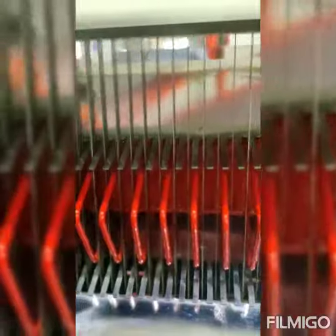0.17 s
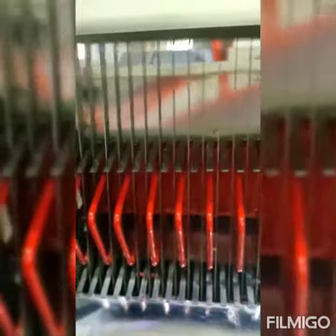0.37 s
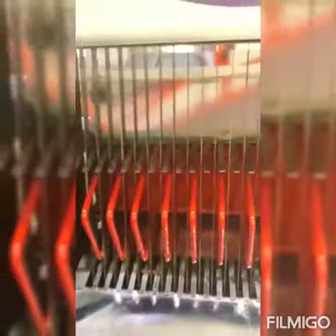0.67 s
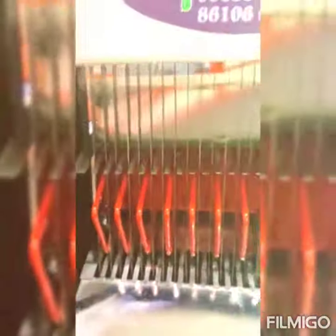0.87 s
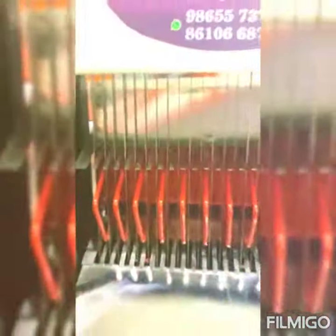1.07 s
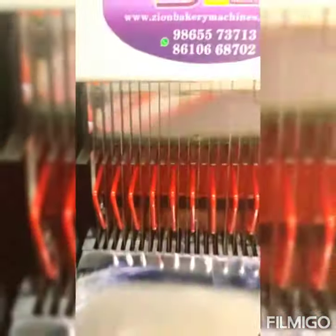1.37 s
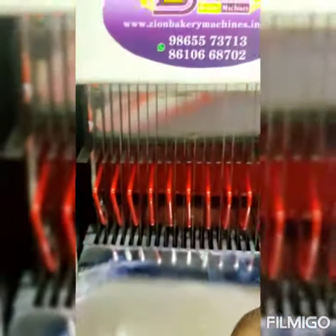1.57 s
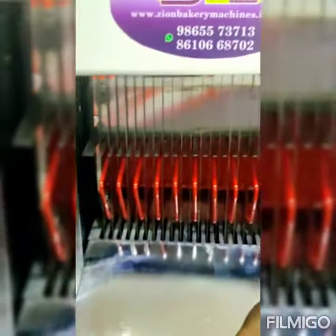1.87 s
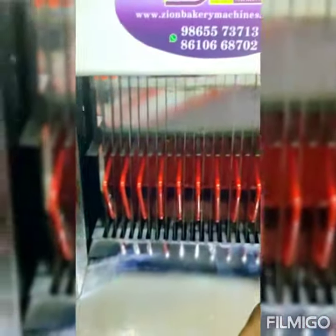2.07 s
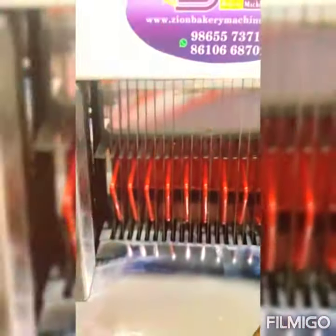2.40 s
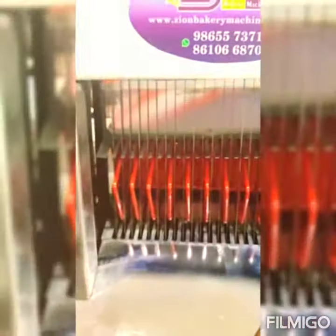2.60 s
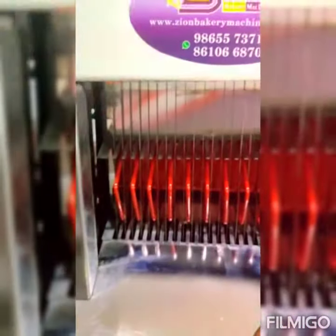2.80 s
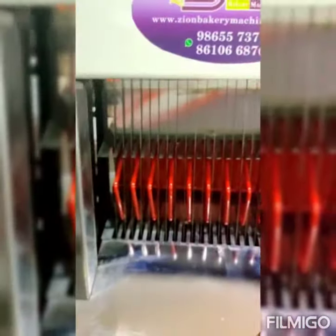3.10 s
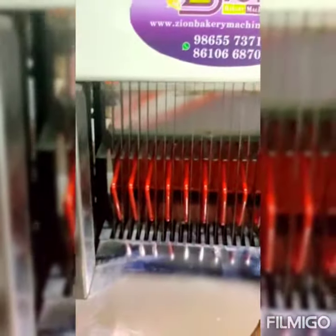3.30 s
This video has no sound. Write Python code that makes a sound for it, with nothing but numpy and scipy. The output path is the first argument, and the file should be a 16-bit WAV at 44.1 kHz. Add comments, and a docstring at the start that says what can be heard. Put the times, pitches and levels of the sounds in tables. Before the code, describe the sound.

A bread slicer is already running and never stops for about 3.5 seconds, close and dry indoors. Boxy sheet-metal rattle throbs rapidly over motor hum and a low drone that swells and sinks, strongest early. Thin blade hiss rides on top. Light knocks come in the first second, with growls near 0.3 and 0.5; faint clinks follow from 1.3. Thuds land at 2.2 and, loudest, 2.5, then a panel growls around 2.75 and 3.0.

```python
"""Play in a bread slicer's crank linkage rattles its sheet-metal housing: impacts excite panel resonances.
The motor adds harmonics of a magnetic hum, slightly wavering drive tones and a low, swelling housing drone.
Blades hiss and ring in their guides with the strokes: grainy friction excites their modes.
Loose metal knocks, a panel growls in short fits, frames clink, and single blades whine, scrape and tick.
The machine runs steadily and is heard from close by in a bakery."""
import sys
import numpy as np
from scipy import signal
from scipy.fft import rfft, irfft
from scipy.io import wavfile

SR = 44100
rng = np.random.default_rng(int(sys.argv[2]) if len(sys.argv) > 2 else 0)


def wav_out(sig):
    """Save sig, one row per channel (or a flat mono array), as 16-bit PCM at SR to the path in sys.argv[1]."""
    wavfile.write(sys.argv[1], SR, np.round(np.clip(np.atleast_2d(sig).T, -1, 1) * 32767).astype(np.int16))


N = 152145
T = np.arange(N) / SR
CRANK_HZ, HUM_HZ = 8.9, 100
# where in a crank turn the frames reverse and where they move fastest (turns)
REVERSAL_TURN, MID_STROKE_TURN = 0.43, 0.16

# levels of the friction and impact sources, before each source's own trim:
# time_s, low_rattle_db, upper_rattle_db, chatter_db, hiss_db
LEVELS = [(0, -16.5, -21.5, -42.5, -36.5), (.8, -18, -22, -45, -37), (1.15, -22, -23.5, -45.5, -39.5),
          (1.95, -22.5, -23, -46.5, -40), (2.4, -20.5, -21.5, -43.5, -41), (3.45, -21, -21.5, -43, -38)]
# broad response of the housing: frequency_hz, relative_db
HOUSING = [(20, -11), (45, -26.5), (90, -8.5), (160, -7), (300, -0.5), (460, -10.5), (620, -3), (800, -2.5),
           (940, -7), (1100, -20.5), (1400, -35), (3000, -63)]
# panel resonances: frequency_hz, width_hz, db_above_broad_response
PANELS = [(125.4, 17.5, 8.5), (172, 14, 9.5), (226, 11, 6), (284, 40, 1.5), (407.3, 32.7, 13),
          (511.4, 16, 8), (603, 13, 6), (658, 13.4, 7)]
# broad response of the guides: frequency_hz, relative_db
GUIDES = [(600, -30), (1150, -6), (1330, -4), (1600, 1), (2050, -5), (2550, -6.5), (3400, -12.5),
          (4500, -12.5), (8000, -30.5)]
# guide resonances: frequency_hz, width_hz, db_above_broad_response
GUIDE_MODES = [(1488, 21, 8.5), (1570, 29, 3), (1715, 14, 6)]


def amp(db):
    """Amplitude gain is ten to the power of decibels over twenty."""
    return 10 ** (np.asarray(db) / 20)


def unit(x):
    """Dividing by the root mean square gives unit power."""
    return x / np.sqrt(np.mean(x ** 2) + 1e-20)


def level(table, axis=1):
    """Gain over time, linear in decibels between the table's points."""
    rows = np.transpose(table)
    return amp(np.interp(T, rows[0], rows[axis]))


def wander(rate_hz):
    """Low-passed noise of about unit rms: a slow random fluctuation."""
    hz = np.fft.rfftfreq(2 * N, 1 / SR)
    spectrum = rfft(rng.standard_normal(2 * N)) / (1 + (hz / rate_hz) ** 4)
    return unit(irfft(spectrum))[:N]


def colour(x, points, peaks=(), size=16384):
    """Minimum-phase filter: the log gain's Hilbert transform sets the phase, so the response is causal."""
    hz = np.fft.rfftfreq(size, 1 / SR)
    f, db = np.transpose(points)
    gain = amp(np.interp(np.log(hz + 1), np.log(f), db))
    for centre, width, peak_db in peaks:
        excess_power = amp(peak_db) ** 2 - 1
        gain = gain * np.sqrt(1 + excess_power / (1 + (2 * (hz - centre) / width) ** 2))
    log_gain = np.log(np.concatenate([gain, gain[-2:0:-1]]))
    minimum_phase = np.exp(signal.hilbert(log_gain).conj())
    ring = np.fft.ifft(minimum_phase).real[:size // 2]
    return unit(irfft(rfft(x, N) * rfft(ring, N), N))


def mode(x, hz, width):
    """A damped resonance, fixed or gliding: heterodyne to zero, low-pass, shift back; unit rms."""
    turn = np.exp(2j * np.pi * np.cumsum(hz * np.ones(len(x))) / SR)
    pole = np.exp(-np.pi * width / SR)
    return unit((turn * signal.lfilter([1], [1, -pole], x / turn)).imag)


def impacts(per_s, spread_db):
    """A random point process of signed impulses with exponentially spread decibel sizes."""
    sizes = amp(spread_db * np.minimum(rng.exponential(1, N), 4))
    signs = rng.choice([-1, 1], N)
    return unit(sizes * signs * (rng.random(N) < per_s / SR))


def strokes(phase, twice_db, once_db):
    """Amplitude modulation at twice and once the crank frequency: two unequal strokes per turn."""
    angle = 2 * np.pi * (CRANK_HZ * T - phase)
    return unit(amp(twice_db * np.cos(2 * angle) + once_db * np.cos(angle)))


def strike(age, rise_s, decay_s):
    """Transient envelope: a linear rise, then the exponential decay of damped energy."""
    return np.minimum(age / rise_s, 1) * np.exp(-np.maximum(age - rise_s, 0) / decay_s)


def tone(hz, waver_db, drift, rate_hz):
    """A sinusoid with random amplitude and phase modulation (drift in radians)."""
    loudness = np.sqrt(2) * amp(waver_db * wander(rate_hz))
    return loudness * np.sin(2 * np.pi * (hz * T + rng.random()) + drift * wander(rate_hz))


def rattle():
    """Impact excitation of panel modes: linkage play strikes the housing in a swell with the crank."""
    # swell above and below the mean, once a turn: time_s, swell_db
    swell_curve = [(0, 2.5), (.4, 1), (.85, 2.5), (1.1, 1.1), (3.45, 0.8)]
    low_trim_db, upper_trim_db, split_hz = -4.5, -5, 577
    buzz = amp(0.83 * np.cos(2 * np.pi * HUM_HZ * T))  # swells at the hum frequency
    swing = level(swell_curve) ** np.cos(2 * np.pi * (CRANK_HZ * T - REVERSAL_TURN))
    stroke_swell = strokes(REVERSAL_TURN, twice_db=0.25, once_db=-0.5)
    drive = impacts(per_s=2200, spread_db=2.0) * stroke_swell * swing * buzz
    body = colour(drive, HOUSING, PANELS)
    low = signal.sosfiltfilt(signal.butter(4, split_hz, fs=SR, output="sos"), body)
    low_rattle = amp(low_trim_db) * level(LEVELS, axis=1) * unit(low)
    upper_rattle = amp(upper_trim_db) * level(LEVELS, axis=2) * unit(body - low)
    return low_rattle + upper_rattle


def motor():
    """Magnetic force gives hum harmonics, the drive wavering tones, the housing a drone that swells and sinks."""
    # one level_db for each multiple of the hum frequency
    hum_levels = [-52, -34, -34.5, -46.5, -37, -44.5, -41]
    # drive tones: pitch_hz, level_db
    drive_tones = [(70.1, -43.5), (225.5, -37.5), (409.6, -36), (656.6, -36.5)]
    # low housing drone: time_s, level_db
    drone_curve = [(0, -24), (.25, -34.5), (.45, -26), (.73, -26), (1.06, -31.5), (1.2, -27), (1.79, -30.5),
                   (1.9, -40.5), (3.45, -32.5)]
    hum = sum(amp(db) * tone(HUM_HZ * (k + 1), waver_db=-1.45, drift=0.15, rate_hz=0.93)
              for k, db in enumerate(hum_levels))
    drive = sum(amp(db) * tone(hz, waver_db=2.0, drift=0.24, rate_hz=3.7) for hz, db in drive_tones)
    drone = tone(122, waver_db=0.4, drift=0.25, rate_hz=5)
    return hum + drive + level(drone_curve) * drone


def burst(rise_s, decay_s, axis):
    """Transient excitation: noise under one strike envelope per knock, at the given level column."""
    # knocks of loose metal: start_s, thud_db, clank_db, sizzle_db
    knock_rows = [(0.057, -29, -33.5, -34.5), (0.382, -35.5, -30, -29), (0.709, -29, -31.5, -48),
                  (.799, -31, -51.5, -39.5), (1.019, -31, -47, -49), (2.185, -22.5, -37.5, -35.5),
                  (2.5198, -15, -32, -29.5), (2.845, -38.5, -36, -35.5)]
    envelope = np.zeros(N)
    for row in knock_rows:
        age = np.maximum(T - row[0], 0)
        envelope += amp(row[axis]) * strike(age, rise_s, decay_s)
    return envelope * rng.standard_normal(N)


def knocks():
    """One blow excites three resonators: the housing thuds, the guides clank, the blades sizzle."""
    # response of the knocked blades: frequency_hz, relative_db
    sizzle_response = [(2000, -27.5), (4700, -22), (5400, -4), (6000, 8), (7700, 4.5), (8300, -17.5)]
    thud = burst(rise_s=0.001, decay_s=0.01, axis=1)
    clank = burst(rise_s=0.001, decay_s=0.016, axis=2)
    sizzle = burst(rise_s=0.002, decay_s=0.014, axis=3)
    # the filter normalizes power, so each burst's own rms is restored
    out = thud.std() * colour(thud, HOUSING, PANELS)
    out += clank.std() * colour(clank, GUIDES, GUIDE_MODES)
    return out + sizzle.std() * colour(sizzle, sizzle_response)


def growl():
    """Noise-driven gliding resonance: a loose panel growls in short fits, its pitch sagging."""
    # modes of the loose panel: frequency_hz at mid-fit, width_hz, relative_db
    loose_modes = [(292, 12, -2), (402, 7.4, -2), (490, 28, -11)]
    # fits of growling: middle_s, level_db
    fits = [(0.291, -24.5), (.51, -28), (2.18, -26.5), (2.755, -20.5), (2.99, -25.5)]
    spread_s, sag_per_s = 0.037, 0.28  # Gaussian spread, fractional fall in pitch
    out = np.zeros(N)
    for middle, db in fits:
        near = abs(T - middle) < 0.1
        age = T[near] - middle
        glide = 1 - sag_per_s * age
        ring = sum(amp(mode_db) * mode(rng.standard_normal(len(age)), hz * glide, width)
                   for hz, width, mode_db in loose_modes)
        out[near] += amp(db) * np.exp(-0.5 * (age / spread_s) ** 2) * ring
    return out


def blades():
    """Friction as dense random impacts: blades hiss through frame modes, strongest at mid-stroke."""
    # broad response of the blades: frequency_hz, relative_db
    blade_response = [(1000, -8), (2200, -8.5), (3000, -3.5), (3500, -6), (4100, -7.5), (5000, -4.5),
                      (5600, 0.5), (6000, 1.5), (6550, 3.5), (7300, -1.5), (7850, -7.5), (8100, -31.5)]
    # frame resonances: frequency_hz, width_hz, db_above_broad_response
    frame_modes = [(5930, 110, 3.5), (6530, 110, 3.5), (7240, 110, 3)]
    trim_db = -5.5
    flicker = amp(1.4 * wander(rate_hz=85))
    drive = impacts(per_s=7000, spread_db=-1.0) * strokes(MID_STROKE_TURN, twice_db=2.0, once_db=1.3)
    return amp(trim_db) * level(LEVELS, axis=4) * colour(drive * flicker, blade_response, frame_modes)


def chatter():
    """Repeated contact across a clearance: the frames chatter unevenly in their resonant guides."""
    trim_db = -2
    uneven = amp(1.9 * wander(rate_hz=10))
    drive = impacts(per_s=3600, spread_db=2.0) * strokes(REVERSAL_TURN, twice_db=0.2, once_db=-1.3)
    return amp(trim_db) * level(LEVELS, axis=3) * colour(drive * uneven, GUIDES, GUIDE_MODES)


def pings(count=22):
    """Impulse response of tuned bars: each blade ticks on its guide and rings at its own pitch."""
    low_hz, high_hz, width_hz = 5910, 7560, 36
    trim_db = -9  # applied to the hiss column
    pitches = np.linspace(low_hz, high_hz, count) + rng.uniform(-40, 40, count)
    swell = strokes(MID_STROKE_TURN, twice_db=0.5, once_db=0.4)
    out = sum(mode(impacts(per_s=15, spread_db=2.5) * swell, hz, width_hz) for hz in pitches)
    return amp(trim_db) * level(LEVELS, axis=4) * unit(out)


def clinks():
    """Struck resonance with contact noise: a frame grazes its guide and rings briefly with some rasp."""
    # grazes: start_s, level_db, pitch_hz
    grazes = [(1.29, -40, 1550), (1.473, -41.5, 1520), (1.62, -41, 1514), (1.719, -43, 1490),
              (2.776, -40, 1490), (3.122, -39.5, 1500), (3.3, -42, 1565)]
    rise_s, decay_s, width_hz, rasp_db = 0.004, 0.025, 38, -2
    out = np.zeros(N)
    rasp = colour(rng.standard_normal(N), GUIDES, GUIDE_MODES)
    for start, db, hz in grazes:
        near = (T >= start) & (T < start + 0.1)
        age = T[near] - start
        ring = mode(rng.standard_normal(len(age)), hz, width_hz)
        out[near] += amp(db) * strike(age, rise_s, decay_s) * (ring + amp(rasp_db) * rasp[near])
    return out


def whine():
    """Two close, noise-driven resonances of one blade waver separately and swell in the same flares."""
    # pair of modes: frequency_hz, width_hz, relative_db
    close_pair = [(2824, 19, -2), (2840, 14, -1.5)]
    # flares of the whine: time_s, level_db
    flares = [(0, -53), (.48, -57), (.54, -44.5), (.62, -52), (.89, -56), (1.14, -50), (1.4, -55.5),
              (3.45, -69)]
    pair = sum(amp(db) * mode(rng.standard_normal(N), hz, width) for hz, width, db in close_pair)
    return level(flares) * pair


def ringing():
    """Friction excitation of narrow modes: rubbing keeps a few taut blades singing with the strokes."""
    # blade modes: frequency_hz, width_hz, relative_db, twice_per_turn_swell_db
    sung_modes = [(4070, 48, -4, 1.5), (4470, 30, -2, 6), (6470, 82, -1, 2.5)]
    # overall ringing: time_s, level_db
    ring_curve = [(0, -54.5), (1.1, -53.5), (2.3, -64.5), (2.9, -57)]
    out = np.zeros(N)
    for hz, width, db, swell_db in sung_modes:
        rub = rng.standard_normal(N) * strokes(MID_STROKE_TURN, swell_db, swell_db / 2)
        out += amp(db) * mode(rub, hz, width)
    return out * level(ring_curve)


def scrape():
    """Sparse impacts on resonances: a blade catches in its slot in scattered grains."""
    # scraped blade modes: frequency_hz, width_hz, relative_db
    slot_modes = [(2488, 26, -0.5), (2800, 97, -1)]
    # overall scraping: time_s, level_db
    scrape_curve = [(0, -65), (2.0, -61), (3.0, -54)]
    swell = strokes(MID_STROKE_TURN, twice_db=1, once_db=0.5)
    grains = sum(amp(db) * mode(impacts(per_s=130, spread_db=4.0) * swell, hz, width)
                 for hz, width, db in slot_modes)
    return level(scrape_curve) * grains


def scene():
    """Superposition: the pressures of all sources add at one microphone."""
    machine = rattle() + motor() + knocks() + growl()
    guides_and_blades = blades() + chatter() + pings() + clinks()
    single_blades = whine() + ringing() + scrape()
    return (machine + guides_and_blades + single_blades)[None]


def record(dry):
    """Band limitation: a linear-phase low-pass stands for the recorder's upper limit."""
    edge_hz = 8080
    low_pass = signal.firwin(601, edge_hz, window=("kaiser", 9), fs=SR)
    return signal.oaconvolve(dry, low_pass[None], "same")


dry = scene()
out = record(dry)
wav_out(out)
```